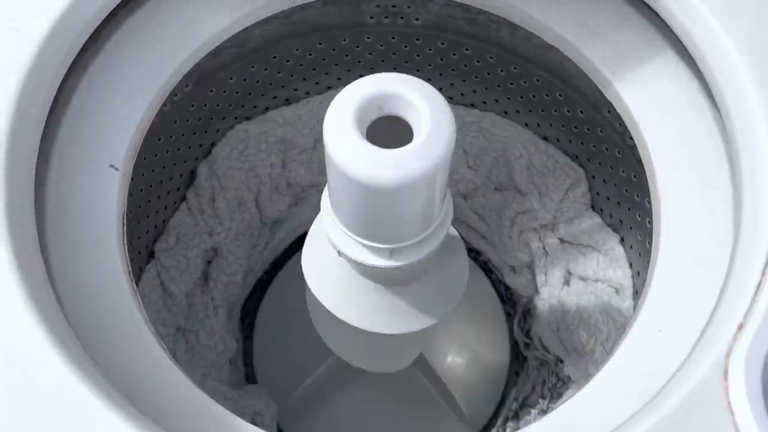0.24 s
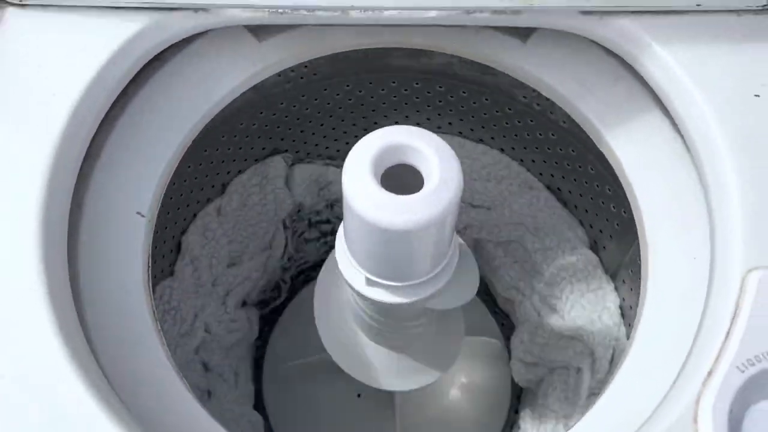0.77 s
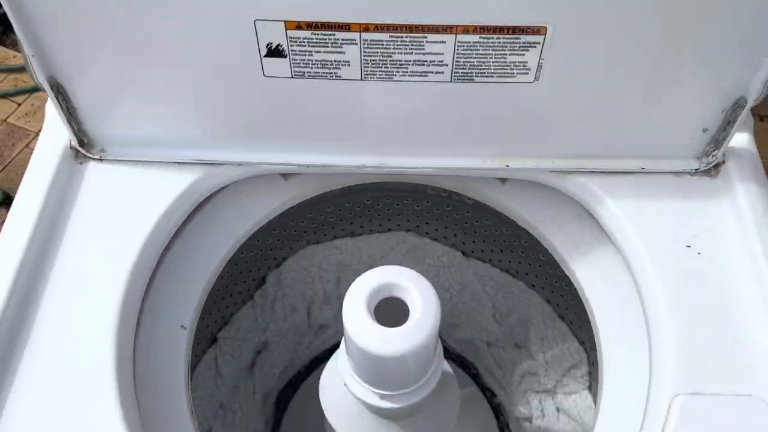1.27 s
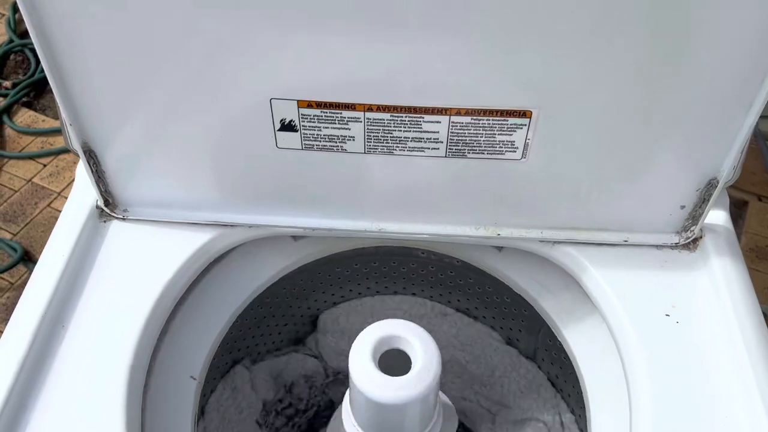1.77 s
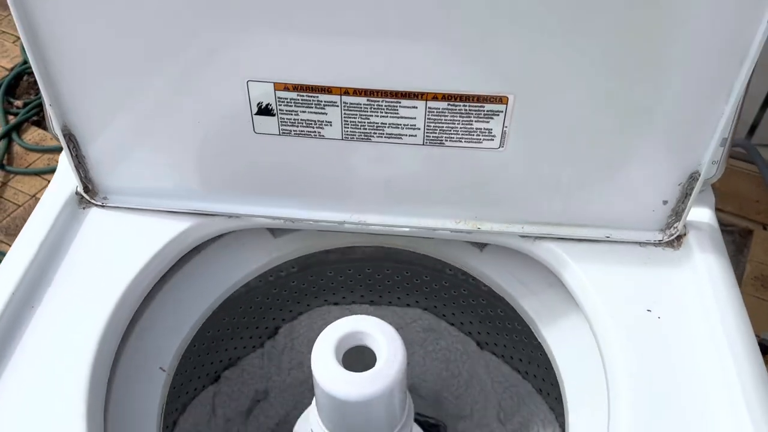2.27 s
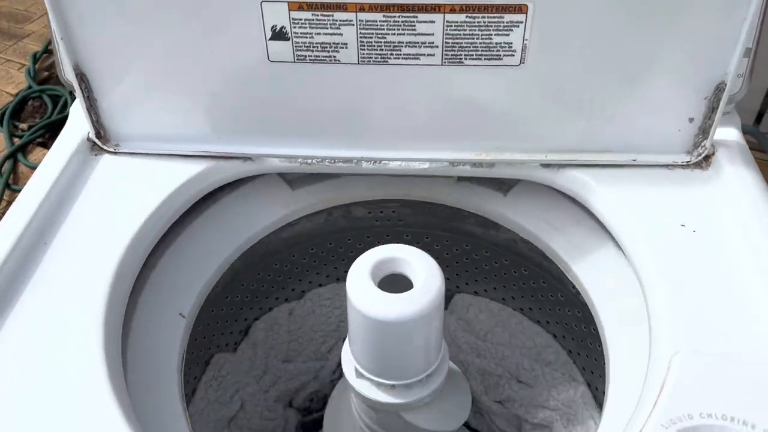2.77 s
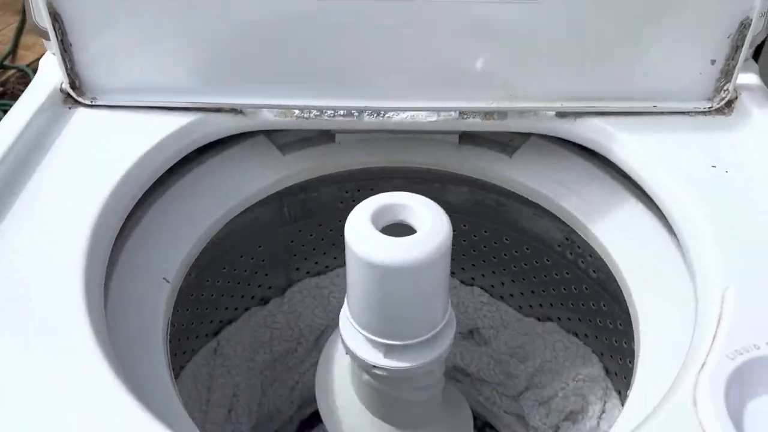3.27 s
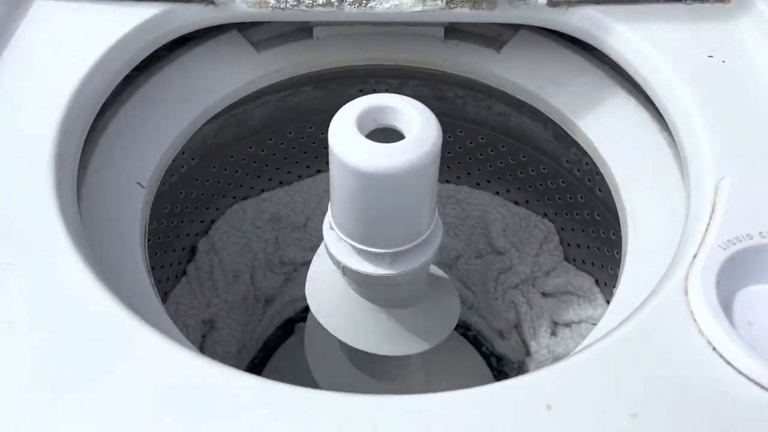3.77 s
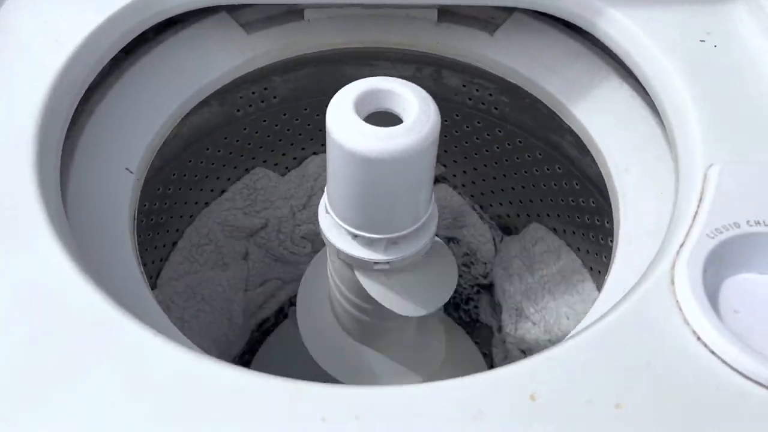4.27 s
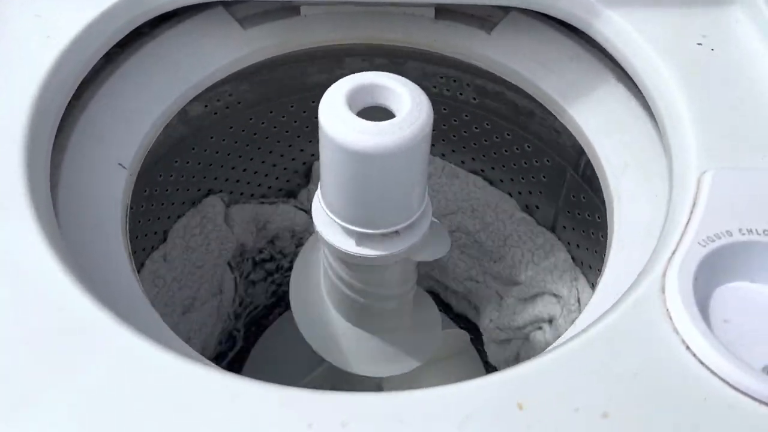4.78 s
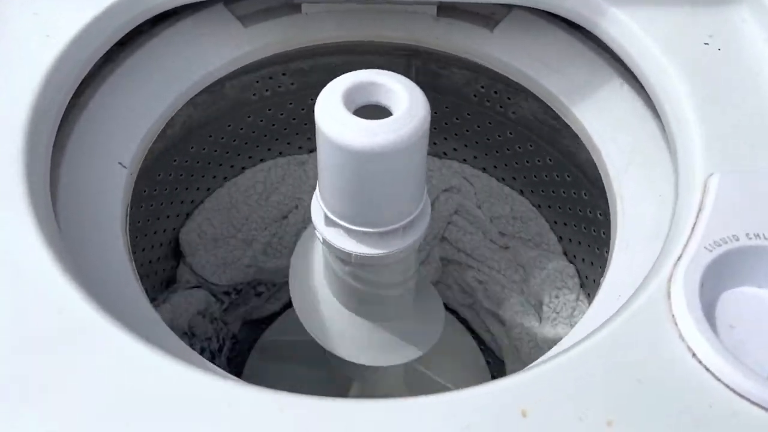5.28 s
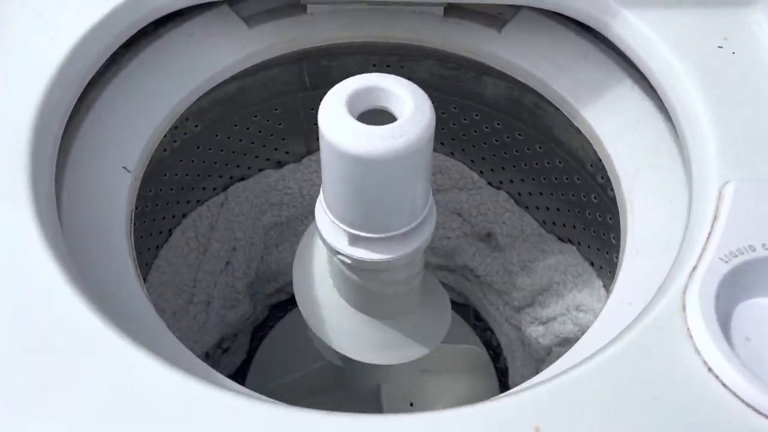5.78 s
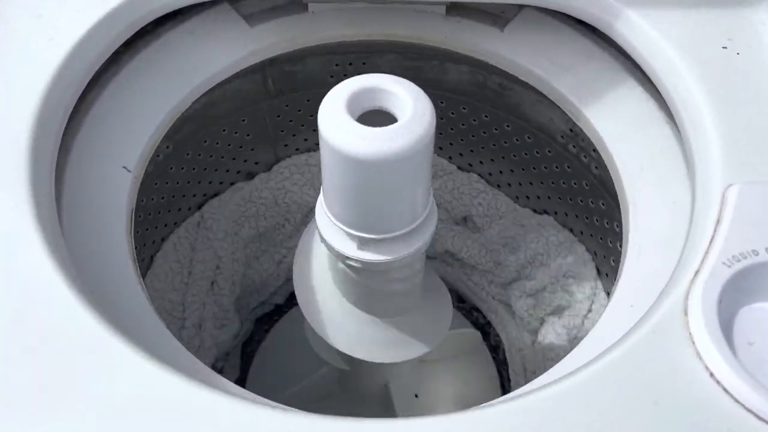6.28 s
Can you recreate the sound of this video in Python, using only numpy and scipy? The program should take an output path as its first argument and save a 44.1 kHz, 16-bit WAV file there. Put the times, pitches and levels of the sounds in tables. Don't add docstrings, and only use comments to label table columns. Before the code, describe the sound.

A washing machine drones in open air, heard close over the tub. Deep mains hum dominates, above it belt rumble and a wavering bearing whine pulse about three times a second, with smooth watery hiss. Low wind gusts flutter across both sides, strongest early on, when the sound also grows slightly duller. From about two and a half seconds, short dull drive knocks tick irregularly, then a tiny distant bird.

```python
import sys
import numpy as np
from scipy import signal
from scipy.fft import rfft, irfft
from scipy.io import wavfile
from scipy.ndimage import uniform_filter1d, minimum_filter1d

SR = 44100
rng = np.random.default_rng(int(sys.argv[2]) if len(sys.argv) > 2 else 0)


def volts(x):
    e = np.asarray(x, float) / 20
    return 10 ** e


def int16_out(signal):
    q = np.round(np.clip(np.atleast_2d(signal).T, -1, 1) * 32767)
    wavfile.write(sys.argv[1], SR, q.astype(np.int16))


N = 288414
T = np.arange(N) / SR
BINS_HZ = np.maximum(np.arange(N // 2 + 1) * SR / N, 1)
EARS = np.array([[.5], [-.5]])
PULLEY_HZ, PULLEY_START_RAD = 2.95, -.4
PULLEY_TURN = 2 * np.pi * PULLEY_HZ * T + PULLEY_START_RAD


def columns(rows, at, scale=np.asarray):
    first, *rest = np.transpose(rows)
    return [np.interp(scale(at), scale(first), column) for column in rest]


def rms_one(x):
    return x / np.sqrt(np.mean(x ** 2))


def drift(rate):
    pole = np.exp(-80 * np.pi * rate / SR)
    draws = rng.standard_normal(N // 40 + 2002)
    slow = signal.lfilter([1], [1, -2 * pole, pole * pole], draws)[2000:]
    return np.interp(np.arange(N) / 40, np.arange(len(slow)), rms_one(slow))


def bump(centre_s, length_s):
    return np.exp(-((T - centre_s) / length_s) ** 2)


def pair(gain, pan_db=0, shared=1, lead=0):
    both, left, right = rfft(rng.standard_normal((3, N)))
    shared = np.clip(shared, 0, 1)
    common = np.sqrt(shared) * both * np.exp(-1j * lead * EARS)
    own = np.sqrt(1 - shared) * np.array([left, right])
    return rms_one(irfft(gain * volts(pan_db * EARS) * (common + own), N))


def bird():
    # (start t/s, end t/s, start f/Hz, end f/Hz, level/dB)
    chirps = [
        (5.29, 5.42, 6150, 6200, -61),
        (5.44, 5.6, 6100, 5950, -63),
        (5.3, 5.66, 4350, 4850, -63),
    ]
    out = 0
    for start, end, start_hz, end_hz, db in chirps:
        part = np.clip((T - start) / (end - start), 0, 1)
        hz = start_hz + (end_hz - start_hz) * part + 40 * drift(30)
        swell = np.sqrt(np.sin(np.pi * part).clip(0))
        out = out + volts(db) * swell * np.sin(2 * np.pi * np.cumsum(hz) / SR)
    return out * volts(14 * EARS)


def water(level_db, top_db):
    # (f/Hz, level/dB per Hz)
    hiss_colour = [(900, -4), (1500, -0.5), (2500, -4), (3300, -6), (5000, -8), (6100, -10.5),
                   (7000, -12.5), (8300, -14), (10200, -21), (12000, -14), (13500, -13.5), (15000, -11.5),
                   (16500, -15)]
    # (f/Hz, left-right/dB, shared share/0-1,
    # right lead/half turns)
    port_image = [(1500, 1, .55, 0), (2500, 2.5, .72, -.15), (3300, 4, .7, -.26), (5000, 4.5, .66, -.14),
                  (6100, 4.5, .45, 0), (6900, 0, .9, 0), (8000, 0, .82, .12), (8800, 0, .9, .68),
                  (9250, 0, 1, 1), (10900, 0, 1, 1), (11500, 0, .8, 1.45), (12500, 0, .98, 1.9),
                  (14300, 0, .98, 2.05), (15700, 0, .8, 2.75)]
    # (t/s, level/dB, length/s)
    sprays = [(.4, -57, .03), (.61, -54, .04), (2.2, -58, .45), (2.48, -50, .04), (2.481, -49, .006),
              (3.97, -54, .015), (4.42, -56, .02), (5.285, -52, .02), (5.1, -55.5, .12), (5.43, -53, .18),
              (6.2, -56, .25)]
    colour = volts(columns(hiss_colour, BINS_HZ, np.log)[0])
    pan_db, shared, lead = columns(port_image, BINS_HZ)
    lead = np.pi * lead
    upper = 1 / (1 + (8500 / BINS_HZ) ** 8)
    low = pair(colour * (1 - upper), pan_db, shared, lead)
    top = pair(colour * upper, pan_db, shared, lead)
    out = volts(level_db + 3.0 + 0.38 * drift(7.5)) * low
    out = out + volts(top_db + 6.0 + .6 * drift(9.0)) * top
    swell = sum(volts(db) * bump(s, length) for s, db, length in sprays)
    bright = 1 / (1 + (2200 / BINS_HZ) ** 4) / (1 + (BINS_HZ / 7500) ** 4)
    return out + swell * pair(bright, pan_db + 4.0, shared, lead)


def wind():
    # (f/Hz, level/dB per Hz)
    buffet = [(18, -29.5), (35, -13), (55, -8), (90, 3.5), (170, -14.5), (300, -16.5), (600, -40.5),
              (1200, -71.5)]
    # (t/s, level/dB)
    breeze_levels = [(0, -42), (.8, -45), (.92, -36), (2.4, -32.5), (2.55, -41.5), (3.3, -44.5), (3.8, -36),
                     (4.5, -39.5), (6.54, -46.5)]
    # (t/s, push on both ports/dB, push apart/dB, length/s)
    gust_events = [(0.117, -36, -47, .06), (.36, -39, -28, 0.054), (0.629, -33, -49, 0.046),
                   (0.954, -34.5, -31, 0.046), (1.053, -28.5, -25.5, 0.036), (1.208, -33.5, -31, .04),
                   (1.358, -36, -22.5, .04), (1.448, -31, -20, 0.043), (1.618, -27.5, -24.5, 0.067),
                   (1.772, -33, -31.5, .06), (1.906, -28.5, -21, .05), (2.117, -34.5, -27, 0.076),
                   (2.361, -34.5, -29.5, 0.063), (2.948, -32.5, -38, 0.046), (3.115, -31, -44, .04),
                   (3.28, -37.5, -38.5, 0.033), (3.418, -30.5, -36, 0.054), (3.681, -35.5, -32.5, .03),
                   (3.918, -35, -37, 0.043), (4.111, -34, -43, .03), (4.38, -36, -36.5, 0.037),
                   (4.562, -37.5, -44, 0.034), (4.758, -26.5, -42, 0.027), (4.99, -40.5, -49.5, .03),
                   (5.723, -34, -36.5, .06), (5.995, -40.5, -36, .04), (6.424, -40, -46, 0.054)]
    # (t/s, level/dB, centre f/Hz, length/s)
    puff_events = [(1.05, -17.5, 162.5, 0.017), (1.065, -15, 58, 0.021), (1.445, -18.5, 198, 0.011),
                   (1.474, -21, 58, 0.029), (1.556, -17, 192, 0.006), (1.663, -23, 60.2, 0.023),
                   (1.864, -28.5, 58.7, 0.022), (1.903, -21.5, 252, 0.0064), (1.947, -20.5, 199, 0.0069),
                   (2.41, -27, 150, 0.022), (3.671, -29, 204, 0.0095), (3.751, -18.5, 161, 0.013),
                   (3.756, -15.5, 60, 0.029), (3.758, -20.5, 240, .013), (4.11, -38, 224, 0.016),
                   (4.334, -19.5, 58, 0.029), (4.774, -33, 55, 0.02)]
    lump_db, apart_db = 3.5, -3
    eddies = pair(volts(columns(buffet, BINS_HZ, np.log)[0]), shared=0)
    push, apart = eddies / np.sqrt(uniform_filter1d(eddies ** 2, size=2400) + 0.029)

    lumps_db = lump_db * np.array([drift(8), drift(8)])
    strength = volts(columns(breeze_levels, T)[0] + lumps_db + np.array([[0], [apart_db]]))
    for s, both_db, split_db, length in gust_events:
        strength = strength + volts(np.array([[both_db], [split_db]])) * bump(s, length)
    both, split = strength
    out = volts(3.5) * both * push + 2 * EARS * volts(-2.5) * split * apart
    for s, db, hz, length in puff_events:
        out = out + volts(db) * bump(s, length) * np.sin(2 * np.pi * hz * (T - s))
    return out


def knocks(decay_s=.006, rise_s=.0015):
    # (t/s, level/dB, ring f/Hz)
    knock_events = [
        (2.436, -36.5, 703),
        (3.019, -26.5, 700),
        (3.98, -30, 550),
        (4.224, -31, 544),
        (4.877, -30, 560),
        (4.916, -29, 638),
        (5.483, -30.5, 692),
        (5.91, -27, 580),
        (6.273, -34.5, 576),
    ]
    out = 0
    for s, db, hz in knock_events:
        age = np.maximum(T - s + rise_s, 0)
        envelope = (1 - np.exp(-age / rise_s)) * np.exp(-age / decay_s)
        out = out + volts(db + 7.0) * envelope * np.sin(2 * np.pi * hz * age)
    return out * volts(-3 * EARS)


def whine(peak_db):
    centre_hz, swing_hz = 712, 42
    throb_db, peak_rad, wander_db = 6.5, -.15, .8
    hz = centre_hz + swing_hz * np.cos(PULLEY_TURN + 1.1) + 4 * drift(8)
    cycle = 2 * np.pi * np.cumsum(hz) / SR
    rough = .45 * drift(20) * np.sin(cycle) + .1 * drift(20) * np.cos(cycle)
    tone = np.cos(cycle + .4 * EARS) + rough
    ring = pair(1 / (1 + ((BINS_HZ - 735) / 30) ** 2), shared=.88, lead=-.7)
    level_db = peak_db + throb_db * (np.cos(PULLEY_TURN - peak_rad) - 1) + wander_db * drift(25)
    return volts(level_db) * (tone + .45 * ring)


def drive(level_db, load_db):
    # (f/Hz, left-right/dB, shared share/0-1, right lead/rad)
    cabinet_image = [(60, 0, .9, 0), (150, 1, .97, 0), (245, -.5, .95, .2), (340, 2, .96, 0),
                     (430, 1, .92, .1), (560, -3, .8, .3), (655, -3, .88, -.2), (800, 1, .6, -.8),
                     (1000, 2.5, .6, -.3), (1180, 3, .45, 1.3), (1400, 0, .45, 0), (2500, 2, .7, -.3)]
    # (f/Hz, level/dB per Hz)
    rumble = [(25, -25.5), (60, 0.5), (130, -1), (350, -2.5), (500, -9.5), (800, -7), (1200, -20.5),
              (2000, -29.5), (3500, -50)]
    # (f/Hz, width/Hz, level/dB, throb/dB, throb delay/turns)
    panels = [(150, 5.9, -3, 1.5, 0.024), (243, 31, -1, 3, .05), (295.3, 15, -4, 4.5, 0.79),
              (338, 37, -1.5, 0, 1.1), (427.4, 36, -6, 0, .65), (560, 59, -11.5, 2, 0.1),
              (660.4, 42, -4.5, 1.5, -0.41), (892, 170, -12, 0.5, -0.5), (1022, 110, -11, 1.5, .1),
              (1104, 280, -12, 2, -0.5), (2358, 160, -28, 2.5, 0), (2590, 39, -27.5, -3, 0.67)]
    thin_panel_hz, thin_follows = 2000, .5
    image = columns(cabinet_image, BINS_HZ)
    colour = volts(columns(rumble, BINS_HZ, np.log)[0])
    out = volts(0.91 * drift(4.2) - 2.5) * pair(colour, *image)
    for hz, width, db, throb_db, delay in panels:
        resonance = 1 / (1 + (2 * (BINS_HZ - hz) / width) ** 2)
        if hz > thin_panel_hz:
            db = db + thin_follows * load_db
        throb = throb_db * np.cos(PULLEY_TURN - 2 * np.pi * delay)
        out = out + volts(db - 9 + throb + 1.1 * drift(1.6)) * pair(resonance, *image)
    joints_db = 0.36 * np.cos(2 * PULLEY_TURN - .9)
    return volts(level_db + joints_db) * rms_one(out)


def hum():
    # (t/s, level/dB)
    hum_levels = [(0, -13), (0.73, -11), (0.8, -13.5), (1.48, -15.5), (1.56, -12.5), (1.78, -15),
                  (1.84, -16.5), (2.04, -16.5), (2.24, -13), (2.31, -17), (2.37, -10), (2.42, -16.5),
                  (2.5, -15), (2.79, -13.5), (2.88, -15), (2.97, -11.5), (3.7, -11.5), (5, -12.5)]
    hum_hz, start_rad, pan_db = 100.045, -.5, 1.0
    level_db, = columns(hum_levels, T)
    tone = np.sqrt(2) * np.cos(2 * np.pi * hum_hz * T + start_rad)
    return volts(level_db + pan_db * EARS) * tone


def scene():
    # (t/s, loss with distance/dB, bearing whine at its peak/dB)
    machine = [(0, 0.5, -35), (.4, 0, -35), (1.0, -1, -41), (1.5, -2.5, -37), (1.9, -3.5, -47),
               (2.4, -2.3, -45.5), (2.8, -2.5, -34.5), (3.4, -1.45, -40.5), (4.1, -1.9, -33.5),
               (4.8, -2, -37), (5.6, -1.35, -34.5), (6.54, -2, -34.5)]
    drive_db, hiss_db, hiss_top_db = -29, -49, -56.5
    hiss_follows, top_follows = .4, 1.9
    loss_db, whine_db = columns(machine, T)
    spray = water(hiss_db + hiss_follows * loss_db, hiss_top_db + top_follows * loss_db)
    cabinet = drive(drive_db + loss_db, whine_db - whine_db.mean())
    return bird() + spray + wind() + knocks() + whine(whine_db) + cabinet + hum()


def band_limit(x):
    return signal.sosfilt(signal.butter(12, 15850, fs=SR, output="sos"), x)


def record(dry):
    peak_limit = .55
    whistle_hz, whistle_db = 9500, -77
    room = peak_limit / np.maximum(np.abs(dry).max(axis=0), peak_limit)
    gain = uniform_filter1d(minimum_filter1d(room, size=900), size=900)
    whistle = volts(whistle_db) * np.sin(2 * np.pi * whistle_hz * T)
    return band_limit(dry * gain + whistle)


dry = scene()
out = record(dry)
int16_out(out)
```